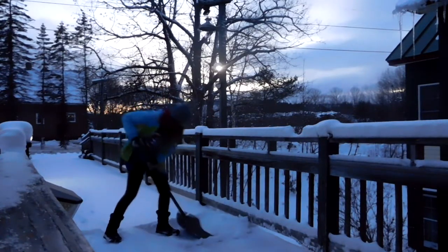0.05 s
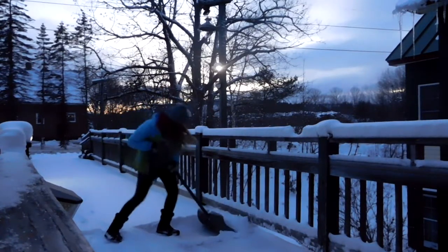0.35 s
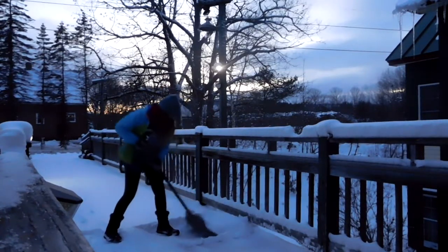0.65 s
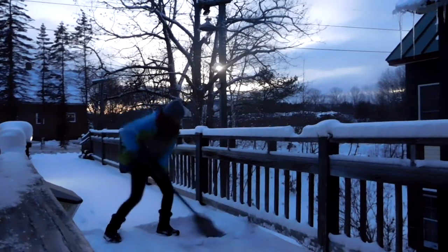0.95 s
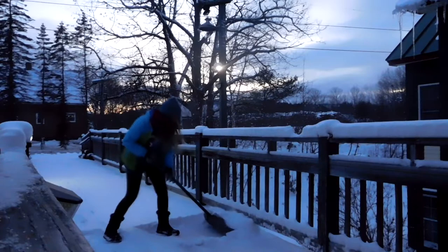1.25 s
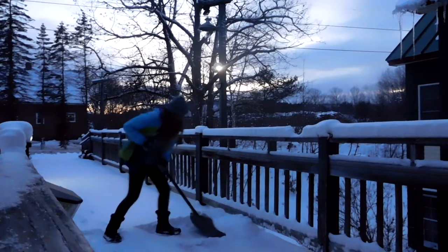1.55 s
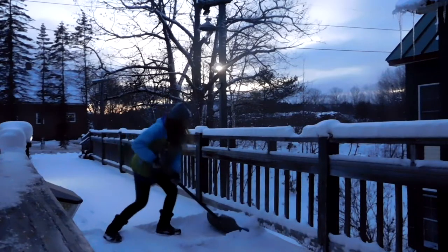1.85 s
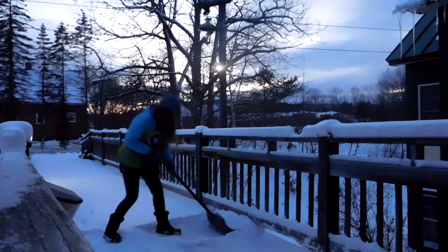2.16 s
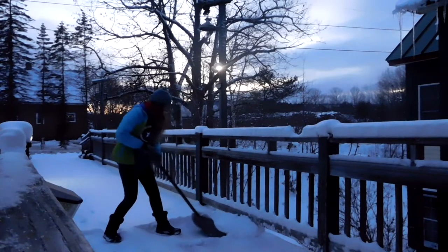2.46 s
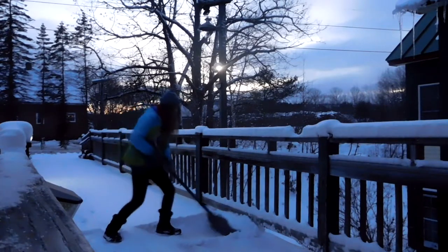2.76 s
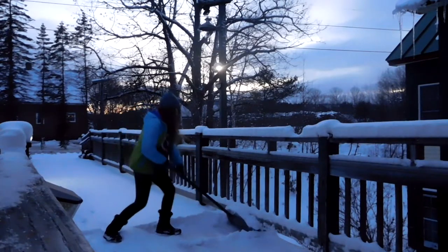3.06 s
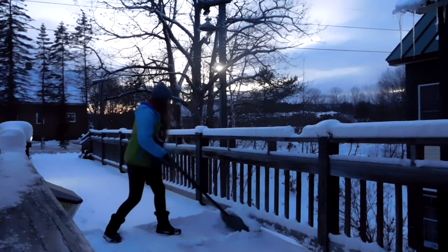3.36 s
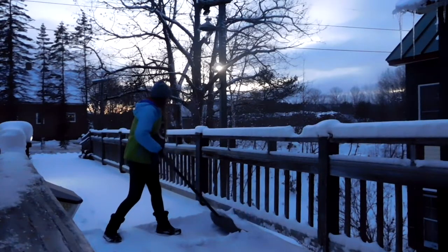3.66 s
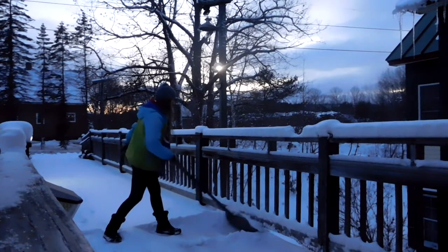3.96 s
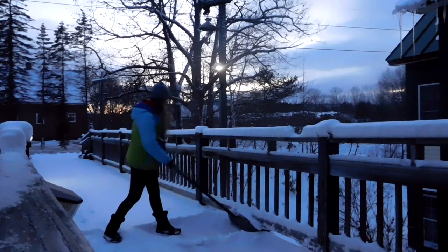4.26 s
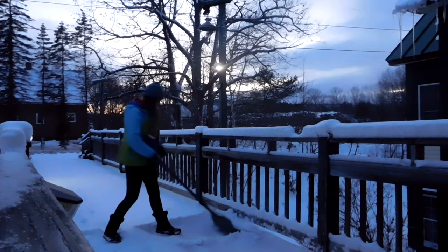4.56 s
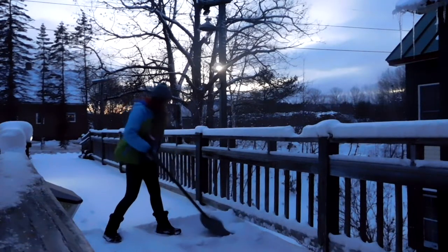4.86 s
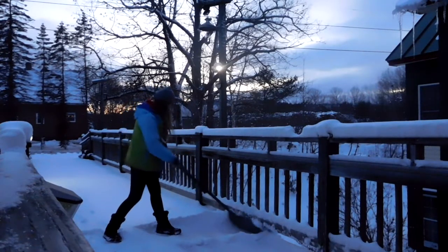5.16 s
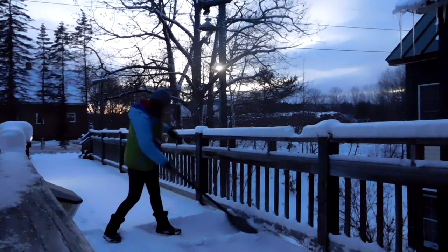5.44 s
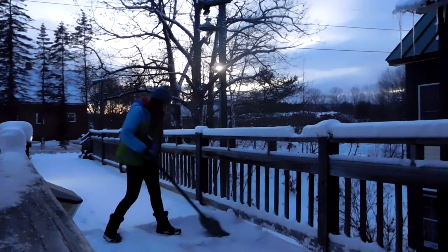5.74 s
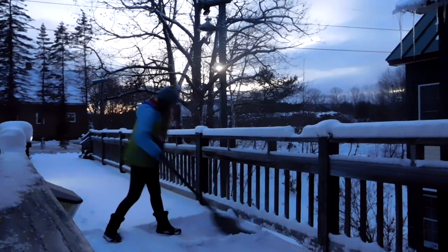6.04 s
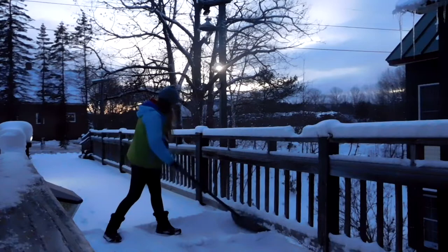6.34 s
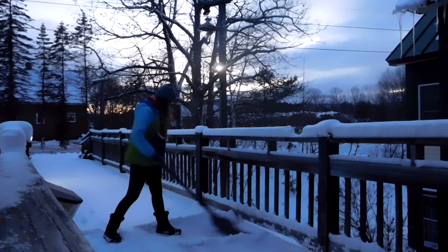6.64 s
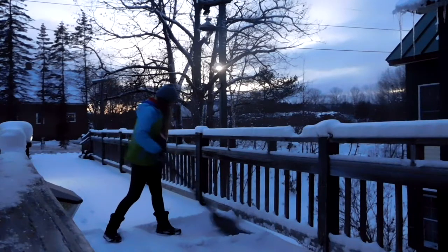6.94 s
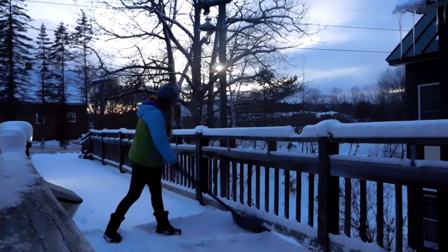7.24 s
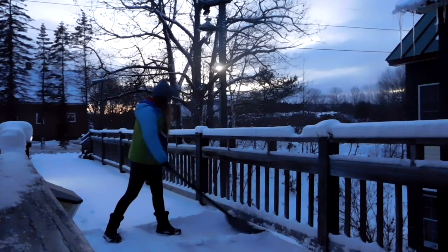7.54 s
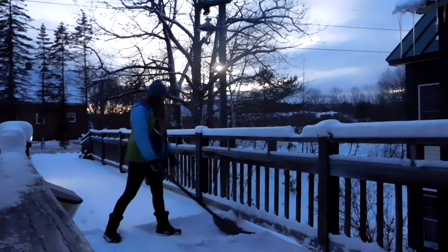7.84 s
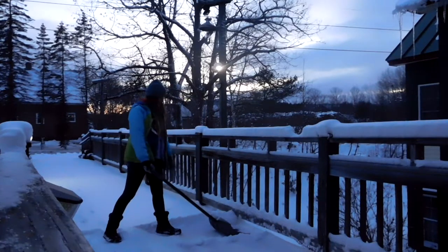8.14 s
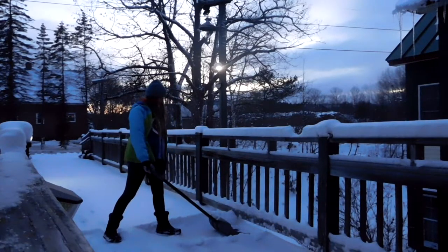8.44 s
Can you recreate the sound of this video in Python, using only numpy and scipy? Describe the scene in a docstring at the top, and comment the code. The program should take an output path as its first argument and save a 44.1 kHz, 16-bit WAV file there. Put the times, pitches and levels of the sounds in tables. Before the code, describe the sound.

A plastic shovel works a snowy wooden deck outdoors, a few metres away. From the start, short hard shoves alternate with lighter drags, about two or three strokes a second. Each is a gritty rasp with a hollow boom from the scoop and a hiss of loose snow, while small bright ticks of ice are scattered throughout. The strongest shoves come in the first four seconds, near 0.1, 0.9, 1.6, 2.7 and 3.9 seconds; later strokes are somewhat softer. The boards rumble faintly underneath. The scoop knocks on wood at about 1 and 3 seconds, clatters briefly at 6.3 seconds and lands its loudest blow at 7.2 seconds, each with a slight short echo. A last drag fades and the shovel rests by 8.2 seconds, leaving the quiet winter air and faint distant machine hum that lie under everything.

```python
"""A plastic shovel works a snowy wooden deck a few metres away: hard shoves, light drags back.
From the first stroke its edge grinds on frozen grit, scoop and boards boom, snow hisses and ice ticks.
The scoop knocks on wood near 1 s and 3 s, clatters at 6.3 s and lands its hardest blow at 7.2 s.
A last drag fades and the shovel rests by 8.2 s, leaving the still winter air and faint far hum
that lie under it all."""
import sys
import numpy as np
from scipy import signal
from scipy.fft import rfft, irfft, next_fast_len
from scipy.io import wavfile
from scipy.ndimage import uniform_filter1d, map_coordinates

SR = 44100
rng = np.random.default_rng(int(sys.argv[2]) if len(sys.argv) > 2 else 0)


def wav_out(sig):
    """Save sig, one row per channel (or a flat mono array), as 16-bit PCM at SR to the path in sys.argv[1]."""
    wavfile.write(sys.argv[1], SR, np.round(np.clip(np.atleast_2d(sig).T, -1, 1) * 32767).astype(np.int16))


N = 383669

# the scoop hits and rebounds on wood, levels relative: start_s, blow_db, crack_offset_db, bass_weight_db
KNOCKS = [(1.057, -20.5, -5, 8), (3.035, -19, -4, 0), (6.278, -13, -8, -7), (6.287, -12.5, -9, -5),
          (6.298, -18, 2, 1), (6.312, -21, -10, -3), (6.329, -28, -17, -4), (7.218, -8.5, -8, 0.5),
          (7.231, -14, -9, 0)]


def shovelling():
    """The gesture as edge, boom and hiss levels in dB: shoves and drags over a light slide."""
    # hard forward shoves: start_s, length_s, rise_s, mid_stroke_edge_db, swell_db,
    # boom_offset_db, hiss_offset_db (both from the edge), hiss_growth_db
    shoves = [(0.115, 0.2, 0.07, -25.5, 0.5, -3.5, -7.5, -3), (0.864, 0.31, 0.23, -24, -16, -3.5, -6.5, -7),
              (1.592, 0.254, 0.15, -25, -8, -4, -9, -2.5), (2.643, 0.255, 0.2, -26.5, -4, -2, -10.5, 5.5),
              (2.86, 0.21, 0.091, -29.5, 1, -0.5, -2.5, -3), (3.875, 0.21, 0.16, -30, 4.5, -1.5, -3.5, 2.5),
              (4.9, 0.25, 0.061, -35.5, 1.5, -0.5, -12.5, 3), (5.11, 0.21, 0.075, -34, -1, 1.5, -3.5, -4),
              (5.93, 0.21, 0.14, -34, 0, 0.5, -9.5, 4), (6.15, 0.17, 0.031, -35, -8, -3.5, -5, 9),
              (6.875, 0.2, 0.082, -34, -1, -0.5, -8, 6)]
    # light pull-backs and short sweeps: same columns as the shoves
    drags = [(0.0, 0.088, 0.004, -36, -2.5, -4.5, -7, 1.0), (0.514, 0.3, 0.097, -38, 3, -4, -4, -5.5),
             (1.236, 0.317, 0.14, -43, 3.5, 2, -6, 2), (1.915, 0.56, 0.072, -49.5, 8, 6, -4.5, 11),
             (3.135, 0.32, 0.0056, -45.0, 11, 1.5, -4.0, 0.5), (3.453, 0.24, 0.12, -45.5, 0.5, 3, -1.5, -9),
             (3.711, 0.29, 0.078, -43.5, 7, 2, -10.5, -3), (4.308, 0.14, 0.13, -40, 1.5, 2, -3.5, 5),
             (4.505, 0.2, 0.075, -45, 2.5, -0.5, -2.5, 2.5), (4.654, 0.14, 0.12, -36, 0, 2.5, -10.5, -3),
             (5.317, 0.306, 0.12, -39.5, 4, -1.5, -5, -1.5), (5.721, 0.12, 0.034, -36, -4, 1.5, -6.5, -8),
             (6.377, 0.236, 0.096, -39, 5.5, -8, -7, -4), (6.679, 0.12, 0.062, -37.0, 5.5, -1, -4.5, -8),
             (7.066, 0.14, 0.08, -38, -3.5, -3.0, -3.0, 1), (7.378, 0.3, 0.05, -43.5, 18.5, -5.5, -4.5, -5),
             (7.693, 0.46, 0.098, -42, -14.5, 2, -6.5, 2)]
    # the blade sliding between strokes: edge_db, boom_db, hiss_db
    slide_db = (-55.5, -51, -59)
    rest_s, stopping_s = 8.22, 0.15
    moving = np.clip((rest_s - np.arange(N) / SR) / stopping_s, 1e-3, 1)
    slide = amp(slide_db)[:, None] ** 2 * moving
    forward = strokes(shoves, lift_db=3, release_db_per_s=229, boom_growth_db=3.1)
    back = strokes(drags, lift_db=0.88, release_db_per_s=109, boom_growth_db=1.8)
    return 10 * np.log10(forward + back + slide)


def strokes(rows, lift_db, release_db_per_s, boom_growth_db):
    """Power of edge, boom and hiss: each stroke bites, swells or sags, and is let go."""
    lift_s = 0.014  # the blade leaves the boards
    t, power = np.arange(N) / SR, np.zeros((3, N))
    for start, length, rise, edge_db, swell_db, boom_db, hiss_db, hiss_growth_db in rows:
        near = (t >= start) & (t < start + length + .5)
        age = t[near] - start
        travel = np.minimum(age / length, 1) - .5  # zero at mid-stroke
        bite = np.sin(np.pi / 2 * np.minimum(age / rise, 1)) ** 2
        after = np.maximum(age - length, 0)
        drop_db = lift_db * np.minimum(after / lift_s, 1) + release_db_per_s * after
        edge = bite * amp(edge_db + swell_db * travel - drop_db)
        boom = edge * amp(boom_db + boom_growth_db * travel)  # grows as snow gathers in the scoop
        hiss = edge * amp(hiss_db + hiss_growth_db * travel)
        power[:, near] += np.array([edge, boom, hiss]) ** 2
    return power


def scrape(edge_db, boom_db, hiss_db):
    """The edge catches and slips on grit, shaking the scoop and spraying snow."""
    # hollow boom of the scoop: freq_hz, gain_db
    scoop_eq = [(60, -53), (125, -24.5), (165, -22.5), (250, -10), (350, -8.5), (500, -3.5), (700, 3),
                (950, 2), (1250, -9.5), (1800, -7), (4000, -58)]
    # rasp of the edge: freq_hz, gain_db
    edge_eq = [(300, -36.5), (800, -4), (1300, -1.5), (2100, 0), (2550, -3.5), (3300, -4), (4000, -16.5),
               (6000, -23.5), (12000, -32)]
    speed = amp((edge_db - edge_db.max()) / 2)
    judder_db = 0.3 * wobble(16) + 0.54 * wobble(45) + .5 * wobble(170)  # jolts of the whole blade
    scoop_force = grit(speed, rate_hz=2500, spread_db=1.5, friction=0.96, drift_db=1.03)
    scoop = stereo(flexing(scoop_force, bend=0.008), scoop_eq)
    edge_force = grit(speed, rate_hz=4000, spread_db=2.5, friction=0.95, drift_db=2.5)
    edge = stereo(flexing(edge_force, bend=0.014), edge_eq)
    body = amp(boom_db - 0.83) * scoop + amp(edge_db + 0.52) * edge
    return amp(judder_db) * (body + amp(hiss_db - 1.35) * snow(speed))


def grit(speed, rate_hz, spread_db, friction, drift_db):
    """Tiny fractures, up to twice as dense at speed, over smooth sliding friction."""
    chance = np.clip(rate_hz * (1 + speed) / SR, 1e-4, 1)
    sizes = amp(spread_db * np.clip(rng.standard_normal(N), -2, 2))
    fractures = (rng.random(N) < chance) * sizes / np.sqrt(chance)
    return wandering(unit(fractures * noise()) + friction * noise(), drift_db)


def wandering(pair, drift_db):
    """The contact wanders along the edge, so the colour drifts in patches."""
    bands = signal.stft(pair, nperseg=1024)[2]
    patches = rng.standard_normal(bands.shape[1:])
    for _ in range(2):
        patches = uniform_filter1d(uniform_filter1d(patches, size=5, axis=0), size=11, axis=1)
    return signal.istft(bands * amp(drift_db * unit(patches)), nperseg=1024)[1][:, :N]


def flexing(force, bend):
    """The blade bends under changing pressure, blending a lower and a higher tuning of the scoop."""
    slack = filtered(force, lambda hz: scoop_resonance(hz / (1 - bend)))
    taut = filtered(force, lambda hz: scoop_resonance(hz / (1 + bend)))
    pressure = .5 + .5 * np.tanh(2 * wobble(8))
    return (1 - pressure) * slack + pressure * taut


def scoop_resonance(hz):
    """Response of the plastic scoop: each resonance shapes its own band."""
    # modes of the scoop pressed on the deck: pitch_hz, width_hz, gain_db
    modes = [(219, 40, 0.5), (280, 56, 5), (436, 28, 5), (543, 79, 6), (730, 52, -0.5), (1100, 95, 4),
             (1525, 230, 3.5), (1857, 69, 2.5), (2015, 71, 3.5), (2253, 160, 6.5), (3110, 470, 3),
             (5150, 660, 10.5)]
    bells = [1 + (amp(db) - 1) * 1j * hz * width / (pitch ** 2 - hz ** 2 + 1j * hz * width)
             for pitch, width, db in modes]
    return np.prod(bells, axis=0)


def snow(speed):
    """Loose snow hisses off the blade with a fine spray of powder and a crackling crust."""
    # hiss of loose snow: freq_hz, gain_db
    snow_eq = [(1500, -11), (3500, 2.5), (5200, -0.5), (6800, -2), (8400, -8.5), (11000, -12.5),
               (15800, -27)]
    # sheen of the finest spray: freq_hz, gain_db
    spray_eq = [(4000, -16), (8400, -2), (10200, 1.5), (11500, -1.5), (13000, -0.5), (15800, -10)]
    # level of that spray as the shovelling goes on: time_s, relative_db
    spray_level = [(0, -10), (0.25, -5.5), (0.7, -8.5), (1.05, -5.5), (1.5, -5), (1.8, -7.5), (2.8, -6),
                   (3.6, -4.5), (4.05, -5.5), (4.8, -4.5), (5.2, -6), (6.1, -5.5), (6.55, -4.5), (7, -5),
                   (7.6, -11.5), (8.1, -11)]
    loose = stereo(grit(speed, rate_hz=4000, spread_db=2.5, friction=1, drift_db=1.9), snow_eq)
    spray = stereo(grit(speed, rate_hz=5300, spread_db=9, friction=1, drift_db=1.0), spray_eq)
    spray_db = np.interp(np.arange(N) / SR, *np.transpose(spray_level)) - 0.5
    crackle = crust(rate_hz=57, size=0.9, decay_s=0.0052) ** (1 - speed / 2)  # stands out in slow drags
    return crackle * (loose + amp(spray_db) * spray)


def crust(rate_hz, size, decay_s):
    """A crust of crystals gives way: the gain leaps and falls back within milliseconds."""
    leaps = (rng.random(N) < rate_hz / SR) * size * rng.random(N) ** 2
    return 1 + signal.lfilter([1], [1, -np.exp(-1 / (decay_s * SR))], leaps)


def catches():
    """The edge grabs for a moment and chatters in one narrow band."""
    # grabs of the edge: peak_s, level_db, pitch_hz, half_width_hz, length_s
    grabs = [(3.435, -41, 700, 200, 0.11), (6.074, -26.5, 1770, 600, 0.017), (6.6, -34, 740, 130, 0.03),
             (7.49, -43.5, 2970, 250, 0.033), (7.662, -34, 840, 200, 0.037)]
    out, t = np.zeros((2, N)), np.arange(N) / SR
    for peak, db, pitch, width, length in grabs:
        chatter = filtered(rng.standard_normal(N), lambda hz: 1 / (1 + ((hz - pitch) / width) ** 2))
        out += amp(db) * np.exp(-2 * ((t - peak) / length) ** 2) * unit(chatter)
    return out


def knocks():
    """Every blow rings the wood at new strengths, with a crunch of packed snow."""
    # ring of scoop and wood before the snow damps it: pitch_hz, relative_db, t60_s
    wood_modes = [(119, -36, .3), (218, -13, 0.16), (251, -18, 0.16), (309, -9.5, 0.36), (435, -2.5, 0.47),
                  (458, -8.5, 0.17), (530, 3, 0.085), (616, 1, 0.081), (664, 1.5, 0.096), (808, -17, 0.16),
                  (884, -5, 0.12), (1067, -11, 0.12), (1190, -16, .1), (1584, -21, 0.14)]
    packed_eq = [(100, -15), (400, 6.5), (1800, 5.5), (4000, -6.0), (6000, -7), (15000, -23)]
    bass_hz = 280  # modes below this follow the weight of the blow
    ring, crunch, t = np.zeros(N + SR), np.zeros((2, N + SR)), np.arange(SR // 2) / SR
    hz, mode_db, t60 = np.transpose(wood_modes)[:, :, None]
    polarity = (-1) ** np.arange(len(hz))[:, None]  # neighbouring modes swing against each other
    attack = 1 - np.exp(-t / 0.0011)
    damping = amp(-60 * t / 0.11) + amp(-11.5)  # the scoop settles into the snow
    crack = amp(-60 * t / 0.027) + amp(-13.5 - 60 * t / 0.27)
    for start, db, crack_db, weight_db in KNOCKS:
        strength_db = mode_db + weight_db * (hz < bass_hz) + 0.44 * rng.standard_normal(hz.shape)
        phase = 1.43 * polarity + 1.36 * rng.standard_normal(hz.shape)
        modes = amp(strength_db - 60 * t / t60) * np.sin(2 * np.pi * hz * t + phase)
        place(ring, start, amp(db - 12) * modes.sum(0) * damping * attack)
        place(crunch, start, amp(db + crack_db) * crack * noise(len(t)))
    return ring[:N] + amp(-4.5) * coloured(crunch[:, :N], packed_eq)


def ice_ticks():
    """Each bit of ice snaps brightly and makes the blade clack."""
    # ice cracking under the edge, levels relative: start_s, snap_db, clack_offset_db
    cracks = [(0.3884, -34, -13.5), (0.536, -29.5, -3.5), (0.6394, -27.5, -17), (0.7356, -34, 7),
              (0.818, -32.5, 4.5), (1.5936, -20.5, -7), (1.9473, -29.5, -7), (2.052, -32, -10),
              (2.2394, -33, -8.5), (2.861, -18, -4), (3.127, -31, -3), (3.369, -31, 3), (3.539, -25, -8),
              (3.5925, -21.5, -17), (3.6704, -24.5, -16), (3.7, -32.5, -13), (3.8427, -31, -12),
              (4.3465, -33, -7), (4.3676, -33, -2), (4.9563, -31, -2), (4.966, -30, 3.5), (5.736, -23, -4),
              (5.845, -34, 0), (6.4457, -32, -7), (6.4627, -24, -7), (7.651, -35, -2)]
    ice_eq = [(1500, -24), (4500, 2), (9000, 0.5), (15000, -8)]
    blade_eq = [(300, -23), (1400, -7), (2400, 1), (3200, 2), (6000, -17)]
    snaps, clacks, t = np.zeros((2, N + SR)), np.zeros((2, N + SR)), np.arange(SR // 10) / SR
    snap = amp(-60 * t / 0.025) + amp(-22 - 60 * t / .06)
    clack = amp(-60 * t / .028)
    for start, db, clack_db in cracks:
        place(snaps, start, amp(db - 11) * snap * noise(len(t)))
        place(clacks, start, amp(db + clack_db - 2) * clack * noise(len(t)))
    return coloured(snaps[:, :N], ice_eq) + coloured(clacks[:, :N], blade_eq)


def deck(boom_db):
    """The boards drone under the pressed blade; the joists rumble under shifting feet and knocks."""
    # weight shifting from foot to foot: start_s, rumble_db
    steps = [(0.6, -61), (0.78, -62), (1.061, -71), (2.44, -67.5), (3.61, -67), (4.02, -70), (4.72, -63),
             (5.14, -60.5), (5.26, -58), (6.18, -57)]
    # low rumble of the joists: freq_hz, gain_db
    joist_eq = [(20, -16), (44, 9), (70, 1), (125, 6.5), (200, -14), (500, -40)]
    # drone of the boards: freq_hz, gain_db
    board_eq = [(25, -13), (45, -13), (85, -6), (120, 13.5), (150, -12), (220, -23), (400, -60)]
    thump_offset_db, drone_offset_db, still_db = -45, -38, -83
    feet = sum(shudder(start, db, rise_s=0.015, t60_s=0.87) for start, db in steps)
    thumps = sum(shudder(start, db + weight_db + thump_offset_db, rise_s=0.028, t60_s=0.6)
                 for start, db, _, weight_db in KNOCKS)
    joists = np.sqrt(feet + thumps + amp(still_db) ** 2) * stereo(noise(), joist_eq)
    return joists + amp(boom_db + drone_offset_db) * stereo(noise(), board_eq)


def shudder(start_s, db, rise_s, t60_s):
    """Power of the joists after a load: a quick build-up and a slow decay."""
    age = np.maximum(np.arange(N) / SR - start_s, 0)
    return (np.minimum(age / rise_s, 1) * amp(db - 60 * np.maximum(age - rise_s, 0) / t60_s)) ** 2


def yard_echo(pair):
    """Railing and house wall answer with a short tail, treble dying first."""
    # decay of the reflections: freq_hz, t60_s
    decay = [(200, 0.33), (1000, 0.39), (4000, 0.17), (12000, 0.21)]
    hz, t, bands = signal.stft(noise(SR // 2), SR, nperseg=256)
    tail = signal.istft(bands * amp(-60 * t / along(decay, hz)[:, None]), SR, nperseg=256)[1]
    send = np.pad(pair.mean(0), (round(.008 * SR), 0))  # 8 ms pre-delay
    wet = signal.fftconvolve(send[None], tail / np.linalg.norm(tail[0]), axes=1)[:, :N]
    return coloured(wet, [(100, 2.0), (15000, -7.0)])


def winter_air():
    """Still air: a soft bed of noise whose level flickers slightly."""
    # tone of the open air: freq_hz, gain_db
    air_eq = [(25, -24), (120, -15), (200, -2.5), (330, 1), (420, 4), (540, 3), (800, 8), (1100, 2.5),
              (1400, 0), (2100, -1), (5000, -8.5), (9000, -12.5), (15800, -12.5)]
    return amp(-54 + 1.5 * wobble(10)) * stereo(noise(), air_eq)


def far_hum():
    """A far machine hums faintly, wavering in pitch and level."""
    # partials of the machine: pitch_hz, level_db
    partials = [(398, -64), (792, -58)]
    waver_db = 3.5
    warped_s = np.cumsum(1 + 0.00302 * wobble(8) + 0.0051 * wobble(90)) / SR
    return sum(amp(db + waver_db * wobble(21)) * np.sin(2 * np.pi * hz * warped_s) for hz, db in partials)


def stereo(pair, eq):
    """Two unrelated signals become left and right, shaped by eq (freq_hz, gain_db), the mid at rms 1."""
    # how alike the two sides are: freq_hz, correlation
    likeness = [(100, 1), (250, 0.93), (850, 0.82), (1080, 0.6), (1350, 0.1), (1700, .55), (2200, 0.7),
                (2700, 0.42), (3200, 0.5), (4400, 0.4), (6500, 0.66), (10500, 0.47), (15000, 0.33)]

    def mid_side(hz):
        width = np.arccos(np.clip(along(likeness, hz), -1, .975)) / 2
        return amp(along(eq, hz)) * [np.cos(width), np.sin(width)]

    mid, side = filtered(pair, mid_side)
    return np.array([mid + side, mid - side]) / np.std(mid)


def coloured(pair, eq):
    """Stereo colour with the mid at the level of the input."""
    return np.std(pair) * stereo(pair, eq)


def filtered(x, response):
    """x through a response given as a function of frequency."""
    size = next_fast_len(N + SR // 2)
    return irfft(rfft(x, size) * response(np.fft.rfftfreq(size, 1 / SR)), size)[..., :N]


def along(points, hz):
    """Read (freq_hz, value) points on a log frequency axis."""
    freqs, values = np.transpose(points)
    return np.interp(np.log(hz + 1), np.log(freqs + 1), values)


def wobble(rate_hz):
    """A smooth random curve with rate_hz knots a second."""
    knots = rng.standard_normal(int(N * rate_hz / SR) + 4)
    return map_coordinates(knots, [np.arange(N) * rate_hz / SR])


def noise(samples=N):
    """Two unrelated channels of white noise."""
    return rng.standard_normal((2, samples))


def place(track, start_s, sound):
    """Mix a sound into a track."""
    track[..., round(start_s * SR):][..., :sound.shape[-1]] += sound


def amp(db):
    """Decibels to gain."""
    return 10 ** (np.asarray(db) / 20)


def unit(x):
    """Scale to rms 1."""
    return x / np.sqrt(np.mean(x ** 2) + 1e-20)


def scene():
    """The shovel on the deck, the echo of its ticks and knocks, and the open air."""
    edge_db, boom_db, hiss_db = shovelling()
    hits = ice_ticks() + knocks()
    shovel = scrape(edge_db, boom_db, hiss_db) + catches() + hits
    return shovel + amp(-11) * yard_echo(hits) + deck(boom_db) + winter_air() + far_hum()


def record(dry):
    """The housing shades each microphone differently; nothing passes above the band limit."""
    # shading of the two sides: freq_hz, left_minus_right_db
    balance = [(200, -0.4), (500, -1.3), (750, -3.5), (1100, -3.8), (1300, -5.5), (2050, 2), (2450, -1),
               (2850, 1.5), (4300, -3), (6600, 0), (7600, -2), (11500, 3.5), (15000, 1)]
    top_hz = 15870
    shaded = filtered(dry, lambda hz: amp(along(balance, hz) * np.array([[.5], [-.5]])))
    return filtered(shaded, lambda hz: hz < top_hz)


dry = scene()
out = record(dry)
wav_out(out)
```